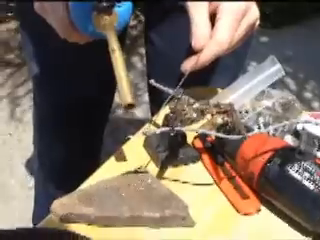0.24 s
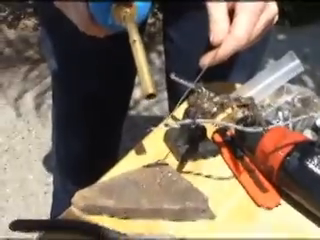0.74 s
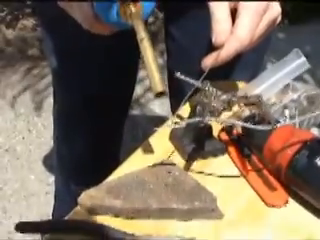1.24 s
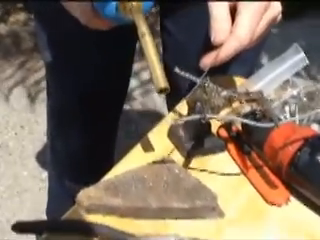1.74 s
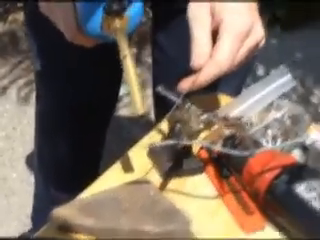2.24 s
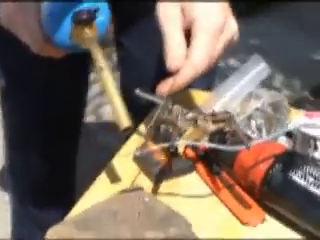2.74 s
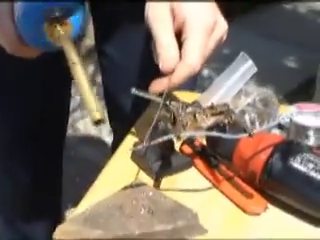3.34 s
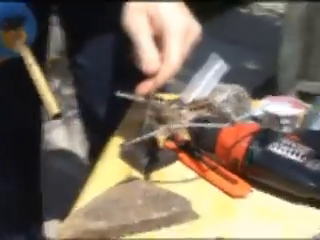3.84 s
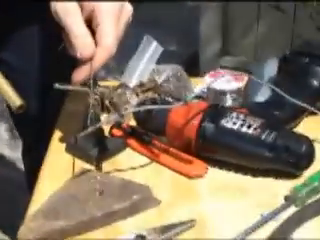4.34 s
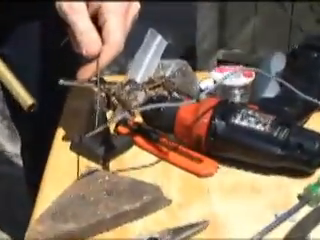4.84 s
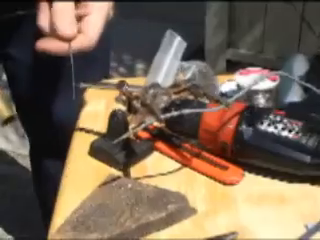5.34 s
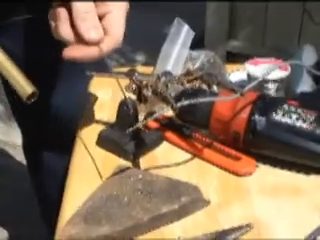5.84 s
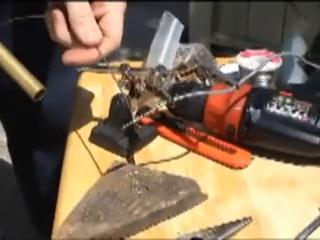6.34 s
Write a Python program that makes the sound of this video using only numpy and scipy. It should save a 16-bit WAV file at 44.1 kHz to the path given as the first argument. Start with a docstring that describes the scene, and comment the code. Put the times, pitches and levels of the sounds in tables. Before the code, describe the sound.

Outdoors at a workbench, a handheld gas torch burns close to the microphone with soft hiss and low rumble. The flame brushes wire in several rough, breathy rushes, then calms with faint ticks and flux spits. Three quick bright blasts follow, then a loud snap, and the flame flutters in dense puffs and cracking pops, gradually weakening. Wind drones and buffets the stereo microphone, mostly until the later part.

```python
"""Outdoors at a workbench, a handheld gas blowtorch heats a wire joint.
Gas noise hisses from the jet over a low rumble, and the flame roars, ticks and rushes as it grazes the wire.
Hot flux spits; three passes full on the joint give loud, bright rushes of noise with a whoosh.
Drawn back, the flame flutters in puffs and cracking pops, while wind noise drones and buffets the microphone."""
import sys
import numpy as np
from scipy import signal
from scipy.fft import rfft, irfft, next_fast_len
from scipy.io import wavfile
from scipy.ndimage import map_coordinates

SR = 44100
rng = np.random.default_rng(int(sys.argv[2]) if len(sys.argv) > 2 else 0)


def digitize_waveform(pressure):
    """Quantize a signal to 16-bit integers and store it at the path in sys.argv[1].

    Rows of a 2-D input are taken as channels; values are limited to [-1, 1].
    """
    field = np.atleast_2d(pressure).T
    bounded = np.clip(field, -1, 1)
    quanta = np.round(bounded * 32767).astype(np.int16)
    wavfile.write(sys.argv[1], SR, quanta)


N = 290178

TIME = np.arange(N) / SR
SIZE = next_fast_len(N + 8192, real=True)
HZ = np.maximum(np.fft.rfftfreq(SIZE, 1 / SR), 1)
GRID_HZ = np.maximum(np.fft.rfftfreq(8192, 1 / SR), 1)

# Source levels stand before the trim in dB that each source adds.
# Colours are relative: every filter is scaled to unit power.

# Gas jet level as the nozzle turns to the microphone. Each row: time in seconds, level in dB.
JET_LEVEL = [(0, -37.5), (1.4, -39.5), (2.4, -34), (6.58, -31.5)]
# Broad colour of the jet. Each row: frequency in Hz, relative level in dB.
JET_COLOUR = [(1500, 3.5), (4000, -14), (6400, 1), (8500, 1.5), (11200, -1), (12600, -7.5), (13800, -6.5),
              (15000, -35)]
# Fixed nozzle peaks in the hiss. Each row: frequency in Hz, width in Hz, height in dB.
NOZZLE_PEAKS = [(6430, 220, 5), (8550, 260, 2.5), (11100, 380, 3)]
# Moving reflections in the hiss. Each row: frequency in Hz, width in Hz, height in dB.
JET_RIPPLE = [(5000, 380, -2), (7150, 300, -3), (8700, 260, 3), (9450, 260, -6), (12050, 300, -6),
              (14450, 300, -9)]
# Reflections shift the colour as the torch moves. Each row: time in seconds, frequency ratio.
SHIFT = [(0, 0.96), (1.7, 1.005), (2.4, 0.9), (2.72, 0.98), (2.83, 1), (2.95, 0.9), (3.03, 0.98),
         (3.17, 1.04), (3.6, 1.01), (4.05, 1), (4.25, 1.02), (4.92, 1.02), (5.27, 1.005), (5.6, 0.85),
         (6.15, 0.89), (6.58, 0.85)]
# Low rumble of burning. Each row: time in seconds, level in dB.
RUMBLE_LEVEL = [(0, -35), (1.8, -33), (2.55, -26), (2.85, -35), (3.3, -29.5), (4.3, -34), (4.6, -38.5),
                (5.8, -33), (6.58, -34)]
# Colour of the rumble. Each row: frequency in Hz, relative level in dB.
RUMBLE_COLOUR = [(105, -22), (155, -3.5), (220, 1.5), (330, -3), (1200, -36.5)]
# Fixed peaks and dips of burner tube and bench. Each row: frequency in Hz, width in Hz, height in dB.
TUBE = [(350, 25, -4), (480, 30, 3), (570, 25, -4), (760, 50, 2), (1410, 45, -5), (1570, 45, 4),
        (1910, 40, -6), (2050, 45, 4), (2190, 50, -3), (2430, 60, 3), (3080, 40, 3)]

# Roar of the calm flame near the work. Each row: time in seconds, level in dB.
CALM_LEVEL = [(0.0, -27), (0.8, -21), (1.6, -24), (1.69, -19), (1.74, -25), (2.08, -28), (2.3, -25),
              (2.65, -24.5)]
# Colour of the calm roar. Each row: frequency in Hz, relative level in dB.
CALM_COLOUR = [(150, -12.5), (300, -1), (480, 3.5), (950, 5), (1400, -4), (3000, -11), (4300, -12.5),
               (6500, -24), (10000, -21.5), (15000, -43)]
# Moving reflections near the wire. Each row: frequency in Hz, width in Hz, height in dB.
GRAZE_RIPPLE = [(1425, 113, -4.5), (2980, 210, 6), (5020, 206, -10), (6680, 700, 4.5), (8070, 410, -8),
                (9900, 320, 5)]
# Livelier spells of faint ticking. Each row: centre in seconds, half-width in seconds, level in dB.
TICK_SPELLS = [(1.87, 0.1, -40), (2.45, 0.32, -30)]
TICK_REST_DB = -36  # ticking between the spells
# Colour of the ticks. Each row: frequency in Hz, relative level in dB.
TICK_COLOUR = [(400, -20), (1700, -4), (3000, 9.5), (5200, 9.5), (7500, -3), (14000, -21)]

# Drone of the wind, with deep lulls. Each row: time in seconds, level in dB.
DRONE_LEVEL = [(0, -34), (3.88, -36), (4.0, -51), (4.28, -36), (4.7, -62), (5.3, -67), (6.2, -46),
               (6.58, -58)]
# Colour of the drone. Each row: frequency in Hz, relative level in dB.
DRONE_COLOUR = [(20, -39), (50, -6.5), (85, -10), (104, 4.5), (130, -5), (250, -12), (600, -36.5)]
# Gusts on the microphone. Each row: centre in seconds, level in dB.
GUSTS = [(0.0, -26), (0.169, -23), (1.0, -28), (1.24, -32), (1.459, -31), (2.03, -43), (2.52, -33),
         (2.829, -29), (3.3, -25), (3.42, -25), (3.57, -22.5), (3.72, -25), (3.87, -20.5), (4.269, -19.5)]
# Colour of the buffeting. Each row: frequency in Hz, relative level in dB.
BUFFET_COLOUR = [(15, 1), (35, -12), (80, 1), (150, -8), (400, -29), (1000, -59)]
GUST_WIDTH_S = 0.057  # half-width of every gust
GUST_ALIKE_DB = -15.5  # part of the buffeting that both ports share
BETWEEN_GUSTS_DB = -10  # buffeting floor, relative to the drone curve

# The flame grazes the wire. Each row: start in seconds, end in seconds, rush level in dB.
GRAZES = [(0.225, 0.43, -26.5), (0.48, 0.73, -23), (0.9, 1.24, -22.5), (1.3, 1.42, -23.5),
          (1.47, 1.57, -22), (1.6, 1.66, -24), (1.8, 1.94, -33)]
# Colour of the grazing rush. Each row: frequency in Hz, relative level in dB.
GRAZE_COLOUR = [(200, -19), (450, -10.5), (750, -6), (1050, 4.5), (1400, -3.5), (3000, -3.5), (4300, -4.5),
                (6500, -6.5), (9800, -15.5), (15000, -39)]
GRAZE_ATTACK_S, GRAZE_RELEASE_S = 0.044, 0.048
# Bright sizzle of the firmest graze. Its one row: centre in seconds, half-width in seconds, level in dB.
SIZZLE_SWELL = (1.49, 0.08, -21)
# Colour of the sizzle. Each row: frequency in Hz, relative level in dB.
SIZZLE_COLOUR = [(3000, -8), (6000, 0), (10000, -7), (15000, -28)]

# Flux spitting on the hot joint. Each row: time in seconds, level in dB.
SPITS = [(1.982, -21), (2.029, -21), (2.134, -22), (2.156, -15), (2.163, -9), (2.170, -13), (2.173, -19),
         (2.436, -21), (3.2488, -2.5), (3.257, -15), (3.268, -15)]
# Colour of the spits. Each row: frequency in Hz, relative level in dB.
SPIT_COLOUR = [(300, -10), (1100, 4), (2000, 1), (3400, 3.5), (5700, -6), (7500, -31), (14000, -41)]

# The flame lies full on the joint. Each row: start in seconds, end in seconds, rush level in dB.
PASSES = [(2.715, 2.832, -18), (2.913, 2.996, -18), (3.041, 3.082, -16.5)]
# Colour of the full rush. Each row: frequency in Hz, relative level in dB.
FULL_COLOUR = [(500, -32), (1300, -7.5), (1650, 0), (2450, 5.5), (3300, 2), (4200, 0.5), (6400, -1),
               (8500, -5.5), (11000, -9.5), (13500, -22), (15000, -33)]
# Moving reflections at the joint. Each row: frequency in Hz, width in Hz, height in dB.
FULL_RIPPLE = [(2190, 180, -7), (4520, 330, -11), (5360, 300, 0.5), (7540, 300, -12), (10150, 320, -10),
               (12700, 300, -9)]
# Colour of the whoosh. Each row: frequency in Hz, relative level in dB.
WHOOSH_COLOUR = [(200, -14), (450, -5), (750, -1), (1000, 1), (1400, -12.5), (2500, -43)]
PASS_ATTACK_S, PASS_RELEASE_S = 0.022, 0.091
# The whoosh lifts where the flame crosses the joint's edge on the way in and out.
WHOOSH_DB, EDGE_LIFT_DB, EDGE_WIDTH_S, EXIT_LAG_S = -24, 6, 0.053, 0.052

# Free flame, dying down as the torch is drawn away. Each row: time in seconds, level in dB.
FLUTTER_LEVEL = [(3.1, -22.5), (3.6, -26.5), (4.55, -27), (4.8, -27), (5.45, -27.5), (5.65, -29.5),
                 (6.28, -30.5), (6.42, -34), (6.58, -38)]
# Flare-ups. Each row: centre in seconds, half-width in seconds, lift in dB.
FLARES = [(4.1, 0.14, 5), (4.41, 0.2, 3.5), (5.25, 0.28, 3.5)]
# Colour of the free roar. Each row: frequency in Hz, relative level in dB.
FREE_COLOUR = [(120, -32), (250, -7), (450, -1), (780, 0), (1100, -0.5), (1700, -2), (2200, 0.5),
               (3600, -6.5), (6000, -12), (12000, -78)]
# Colour of the sputter. Each row: frequency in Hz, relative level in dB.
SPUTTER_COLOUR = [(200, -21), (600, 1.5), (1500, 4), (2200, 1), (3600, -1), (6000, -8.5), (8000, -10),
                  (14000, -30)]
# Moving reflections in open air. Each row: frequency in Hz, width in Hz, height in dB.
FREE_RIPPLE = [(1550, 153, 0), (2027, 130, -10.5), (2240, 45, -2.5), (2800, 190, -7), (3600, 123, 0),
               (4950, 380, -7.5)]
# Tube peaks and dips clear of the work. Each row: frequency in Hz, width in Hz, height in dB.
FREE_TUBE = [(318, 26, -6.5), (470, 25, 4.5), (797, 63, 3.5), (1255, 28, 4), (1615, 51, 4)]
# Usual wait for fresh gas, its spread (natural log), and the spread of puff sizes below their cap.
REFILL_S, REFILL_SPREAD, PUFF_SPREAD_DB = 0.0075, 0.35, 4.0
PUFF_RISE_S, PUFF_FALL_S = 0.0004, 0.0007  # of a puff's power
# Loudest pops of the flame. Each row: time in seconds, relative level in dB.
POPS = [(3.333, -13.0), (3.443, -13.5), (3.51, -11.0), (3.531, -15.0), (3.618, -15.5), (3.671, -15.5),
        (3.834, -15.5), (3.844, -15.0), (3.912, -13.5), (4.059, -11.0), (4.069, -13.5), (4.104, -11.0),
        (4.115, -11.0), (4.197, -13.5), (4.266, -13.0), (4.348, -13.0), (4.384, -13.5), (4.399, -12.5),
        (4.41, -13.5), (4.457, -9.5), (4.464, -13.0), (4.513, -14.0), (4.537, -14.0), (4.547, -12.0),
        (4.602, -13.5), (4.619, -14.0), (4.629, -15.0), (4.693, -13.5), (4.72, -13.5), (4.733, -14.5),
        (4.818, -13.5), (4.83, -16.0), (4.855, -13.0), (4.908, -14.5), (4.947, -12.5), (5.038, -14.5),
        (5.08, -12.5), (5.088, -14.0), (5.115, -13.0), (5.211, -11.0), (5.251, -10.0), (5.257, -11.5),
        (5.326, -16.0), (5.341, -15.5), (5.365, -10.0), (5.416, -13.5), (5.452, -13.0), (5.473, -15.5),
        (5.753, -16.5), (5.876, -15.5), (5.952, -14.5), (5.984, -16.0), (6.021, -16.5), (6.053, -16.5),
        (6.103, -14.5), (6.157, -15.0), (6.209, -14.0), (6.283, -17.0), (6.3, -12.5)]
# Colour of a single pop. Each row: frequency in Hz, relative level in dB.
POP_COLOUR = [(200, -24), (700, -3), (1500, 3), (3700, -3.5), (6000, -6.5), (13000, -32)]

# Scatter from bench and ground. Each row: frequency in Hz, relative level in dB.
SCATTER_COLOUR = [(300, -19), (1200, 14.5), (2500, 0.5), (5000, -29), (9000, 6.5), (14000, 8.5)]
# Level between the two microphone ports. Each row: frequency in Hz, left minus right in dB.
PORT_BALANCE = [(1200, .5), (2700, -0.5), (6400, 0), (8500, -7.5), (10000, -4.5), (12000, 5), (14000, -1.5)]
# Phase between the ports. Each row: frequency in Hz, lead of the left in radians.
PORT_PHASE = [(1200, 0.059), (1750, -0.89), (2150, 0.27), (4600, -0.23), (7800, -0.64), (9200, 1),
              (11300, 0.73), (13500, -0.014)]
CUTOFF_HZ = 15100


def from_db(db):
    """Decibels to gain."""
    return 10 ** (np.asarray(db) / 20)


def rms_one(x):
    """Scale to unit rms."""
    return x / np.sqrt(np.mean(x ** 2) + 1e-20)


def at_hz(points, hz=GRID_HZ):
    """A spectrum table read on a log-frequency axis."""
    points_hz, value = np.transpose(points)
    return np.interp(np.log(hz), np.log(points_hz), value)


def bumps(ripple):
    """Bell-shaped peaks and dips, in dB."""
    return sum(height * np.exp(-.5 * ((GRID_HZ - hz) / width) ** 2) for hz, width, height in ripple)


def white():
    """Fresh white noise."""
    return rng.standard_normal(N)


def drift(rate):
    """Smooth chance with unit spread, changing about `rate` times a second."""
    smooth = rfft(rng.standard_normal(SIZE)) / (1 + (HZ / rate) ** 2)
    return rms_one(irfft(smooth, SIZE)[:N])


def gain_curve(rows):
    """A (time, dB) curve as a gain, fading quickly outside its span."""
    s, db = np.transpose(rows)
    outside = np.abs(TIME - np.clip(TIME, s[0], s[-1]))
    return from_db(np.interp(TIME, s, db) - 200 * outside)


def swell(s, width_s):
    """A smooth rise and fall of height 1 around time s."""
    return np.exp(-((TIME - s) / width_s) ** 2)


def held(start, end, attack_s, release_s):
    """A gain that swells up to `start`, holds until `end` and dies away."""
    early, late = np.maximum(start - TIME, 0), np.maximum(TIME - end, 0)
    return np.exp(-(early / attack_s) ** 2 - late / release_s)


def contacts(rows, attack_s, release_s):
    """Gain of a run of contacts between flame and metal; the strongest one rules."""
    return np.max([from_db(db) * held(start, end, attack_s, release_s) for start, end, db in rows], axis=0)


def colour(x, db):
    """Causal (minimum-phase) filter of unit power gain with the shape of a dB response."""
    cepstrum = irfft(np.log(rms_one(from_db(db))))
    half = len(cepstrum) // 2
    # folding the cepstrum forward makes the filter minimum phase
    cepstrum[1:half] *= 2
    cepstrum[half + 1:] = 0
    return signal.oaconvolve(x, irfft(np.exp(rfft(cepstrum))))[:N]


def slide():
    """Reading position, in samples, that scales a colour by the torch's shift."""
    return np.cumsum(np.interp(TIME, *np.transpose(SHIFT)))


def moving(x, ripple, echo_s=0.00087, echo_db=0.12):
    """Reflections carve peaks, dips and a fine comb, which slide as the torch moves."""
    comb = echo_db * np.cos(2 * np.pi * GRID_HZ * echo_s)
    carved = colour(x, bumps(ripple) - comb)
    return map_coordinates(carved, [slide()], order=3, mode="mirror")


def radiated(x, spectrum, ripple, resonances=TUBE):
    """A flame source at unit rms with its broad colour, tube resonances and moving reflections."""
    return rms_one(colour(moving(x, ripple), at_hz(spectrum) + bumps(resonances)))


def eddies(rough_db, rough_rate, sway_db):
    """Flow noise roughened by eddies, while the flame sways about 20 times a second."""
    return white() * from_db(rough_db * drift(rough_rate) + sway_db * drift(20))


def kicks_at(events):
    """One impulse for each (time, dB) row."""
    s, db = np.transpose(events)
    kicks = np.zeros(N)
    kicks[np.round(s * SR).astype(int)] = from_db(db)
    return kicks


def bursts(kicks, tail_s, snap_db):
    """Each kick snaps, then sets off noise that swells and dies within milliseconds."""
    keep = np.exp(-2 / (tail_s * SR))
    power = signal.lfilter([(1 - keep) ** 2], [1, -2 * keep, keep ** 2], kicks ** 2 + 1e-18)
    return from_db(snap_db) * kicks + np.sqrt(np.abs(power)) * white()


def puffs(kicks, snap_db):
    """A pocket of gas goes off: noise swells to a snap and dies away a little more slowly."""
    t = np.arange(-256, 257) / SR
    shape = np.exp(np.minimum(t / PUFF_RISE_S, -t / PUFF_FALL_S))
    power = signal.oaconvolve(kicks ** 2, shape, "same")
    return from_db(snap_db) * kicks + np.sqrt(np.abs(power)) * white()


def jet_hiss():
    """Smooth gas noise with the nozzle's fixed peaks and the sliding reflections."""
    return colour(moving(white(), JET_RIPPLE), at_hz(JET_COLOUR) + bumps(NOZZLE_PEAKS))


def burner():
    """Gas hisses smoothly out of the jet over the low rumble of burning."""
    hiss = gain_curve(JET_LEVEL) * from_db(4.0) * jet_hiss()
    rumble = colour(white(), at_hz(RUMBLE_COLOUR) + bumps(TUBE))
    return hiss + gain_curve(RUMBLE_LEVEL) * from_db(-0.5) * rumble


def scattered_hiss():
    """Jet hiss also arrives from all around, unrelated on the two sides."""
    return gain_curve(JET_LEVEL) * from_db(-9) * np.array([jet_hiss(), jet_hiss()])


def calm_roar():
    """The calm flame roars as eddies roughen its flow."""
    flow = eddies(rough_db=1.5, rough_rate=79, sway_db=0.9)
    return gain_curve(CALM_LEVEL) * from_db(-1.0) * radiated(flow, CALM_COLOUR, GRAZE_RIPPLE)


def crackle(per_s, spread_db, clump_db):
    """Pockets of gas of uneven size ignite at random, in loose clumps."""
    born = rng.random(N) < per_s * from_db(clump_db * drift(25)) / SR
    sizes = from_db(spread_db * np.minimum(rng.exponential(1, N), 2))
    return bursts(born * sizes, tail_s=0.00029, snap_db=-6.5)


def ticking():
    """Small gas pockets tick faintly until the flame first lies full on the joint."""
    calm = held(0, PASSES[0][0], PASS_ATTACK_S, PASS_RELEASE_S)
    spells = sum(from_db(db) * swell(s, width) for s, width, db in TICK_SPELLS)
    gain = calm * (from_db(TICK_REST_DB) + spells)
    pockets = crackle(per_s=410, spread_db=1.0, clump_db=-0.5)
    return gain * from_db(-3.5) * radiated(pockets, TICK_COLOUR, GRAZE_RIPPLE)


def breeze():
    """Wind drones on the microphone, and its gusts push the two ports mostly in opposite senses."""
    wind = gain_curve(DRONE_LEVEL)
    gusts = wind * from_db(BETWEEN_GUSTS_DB) + sum(from_db(db) * swell(s, GUST_WIDTH_S) for s, db in GUSTS)
    drone = wind * from_db(-0.5) * colour(white(), at_hz(DRONE_COLOUR))
    buffet = gusts * from_db(-1.0 + 0.79 * drift(9.1)) * colour(white(), at_hz(BUFFET_COLOUR))
    shared = gusts * from_db(GUST_ALIKE_DB) * colour(white(), at_hz(BUFFET_COLOUR))
    return drone + shared + buffet * [[1], [-1]]


def grazing_rush():
    """The wire breaks the grazing flame into a loud, finely rough rush."""
    flow = eddies(rough_db=1.2, rough_rate=1300, sway_db=0.46)
    gain = contacts(GRAZES, GRAZE_ATTACK_S, GRAZE_RELEASE_S) * from_db(4.5)
    return gain * radiated(flow, GRAZE_COLOUR, GRAZE_RIPPLE)


def sizzle():
    """The firmest graze adds a short swell of bright noise."""
    s, width_s, db = SIZZLE_SWELL
    return from_db(db) * swell(s, width_s) * radiated(white(), SIZZLE_COLOUR, GRAZE_RIPPLE)


def flux():
    """Hot flux spits: a hard snap, then a brief sizzle."""
    kicks = kicks_at(SPITS)
    snaps = from_db(-3.5) * puffs(kicks, snap_db=17)
    tails = from_db(5.0) * bursts(kicks, tail_s=0.003, snap_db=-20.0)
    return colour(snaps + tails, at_hz(SPIT_COLOUR))


def whoosh_gain():
    """The whoosh lasts from the first pass to just after the last and lifts at the joint's two edges."""
    enter, leave = PASSES[0][0], PASSES[-1][1] + EXIT_LAG_S
    at_edge = swell(enter, EDGE_WIDTH_S) + swell(leave, EDGE_WIDTH_S)
    return from_db(WHOOSH_DB + EDGE_LIFT_DB * at_edge) * held(enter, leave, PASS_ATTACK_S, PASS_RELEASE_S)


def full_rush():
    """Full on the joint, one turbulent blast feeds both a bright rush and a lower whoosh."""
    blast = eddies(rough_db=0.6, rough_rate=150, sway_db=0.73)
    gain = contacts(PASSES, PASS_ATTACK_S, PASS_RELEASE_S) * from_db(4.0)
    rush = gain * radiated(blast, FULL_COLOUR, FULL_RIPPLE)
    whoosh = whoosh_gain() * from_db(1.5) * colour(blast, at_hz(WHOOSH_COLOUR) + bumps(TUBE))
    return rush + whoosh


def sputtering(count=900):
    """Puffs of uneven size follow one another, each waiting for fresh gas."""
    wait, size = rng.standard_normal((count, 2)).T
    s = FLUTTER_LEVEL[0][0] + np.cumsum(REFILL_S * np.exp(REFILL_SPREAD * wait))
    # leave out puffs near the listed pop times; the sliding reflections shift the rest later on
    clear = np.abs(s[:, None] - np.array(POPS)[:, 0]).min(axis=1) > REFILL_S * 2 / 3
    rows = np.transpose([s, PUFF_SPREAD_DB * np.minimum(size, .5)])
    return puffs(kicks_at(rows[clear & (s < TIME[-1])]), snap_db=8)


def free_flame():
    """In open air the flame tears into a ragged, sputtering roar that flares now and then."""
    flow = eddies(rough_db=2.0, rough_rate=342, sway_db=0.75)
    roar = radiated(flow, FREE_COLOUR, FREE_RIPPLE, FREE_TUBE)
    sputter = radiated(sputtering(), SPUTTER_COLOUR, FREE_RIPPLE, FREE_TUBE)
    flare_db = sum(db * swell(s, width) for s, width, db in FLARES)
    flutter = gain_curve(FLUTTER_LEVEL) * from_db(flare_db)
    return flutter * (from_db(0.3) * roar + from_db(-4.0) * sputter)


def pops():
    """The largest gas pockets stand out as single cracks, with the free flame's resonances."""
    s, db = np.transpose(POPS)
    # place each kick where the sliding read finds it, two rise times after its listed time
    kick_s = np.interp(s + 2 * PUFF_RISE_S, TIME, slide()) / SR
    kicks = kicks_at(np.transpose([kick_s, db]))
    cracks = moving(puffs(kicks, snap_db=16), FREE_RIPPLE)
    return from_db(-0.5) * colour(cracks, at_hz(POP_COLOUR) + bumps(FREE_TUBE))


def ports(x):
    """The two ports hear the torch with a small difference in level and phase."""
    half = from_db(at_hz(PORT_BALANCE, HZ) / 2) * np.exp(.5j * at_hz(PORT_PHASE, HZ))
    return irfft(rfft(x, SIZE) * np.array([half, 1 / half]), SIZE)[:, :N]


def yard(x, decay_s):
    """Quickly dying scatter from bench and ground, different on each side."""
    t = TIME[:SR // 8]
    tail = rng.standard_normal((2, len(t))) * np.exp(-t / decay_s) * np.sqrt(2 / (decay_s * SR))
    return signal.oaconvolve(colour(x, at_hz(SCATTER_COLOUR))[None], tail, axes=1)[:, :N]


def scene():
    """Torch, surroundings and wind; so small a flame radiates almost no bass."""
    on_work = calm_roar() + ticking() + grazing_rush() + sizzle() + full_rush()
    torch = burner() + on_work + flux() + free_flame() + pops()
    torch = signal.sosfilt(signal.butter(2, 95, "high", fs=SR, output="sos"), torch)
    return ports(torch) + from_db(-19.0) * yard(torch, decay_s=0.019) + scattered_hiss() + breeze()


def record(dry):
    """Peaks beyond full scale clip, then a steep low-pass cuts the top."""
    low_pass = signal.ellip(10, .1, 90, CUTOFF_HZ, fs=SR, output="sos")
    return signal.sosfilt(low_pass, np.clip(dry, -1, 1))


dry = scene()
out = record(dry)
digitize_waveform(out)
```